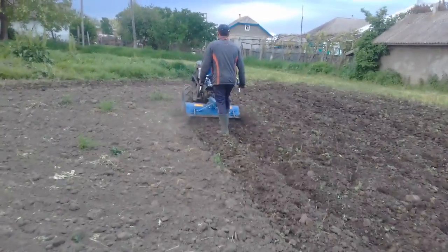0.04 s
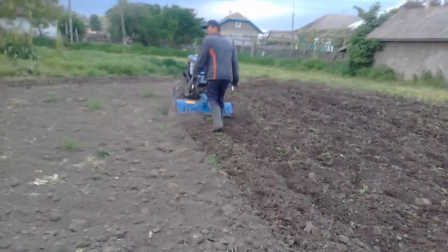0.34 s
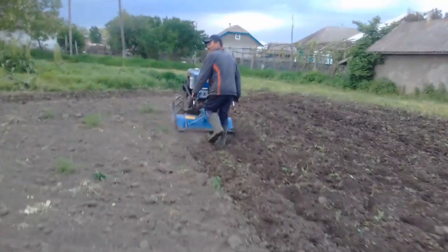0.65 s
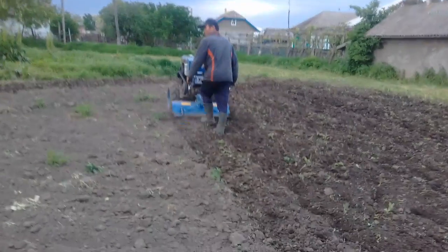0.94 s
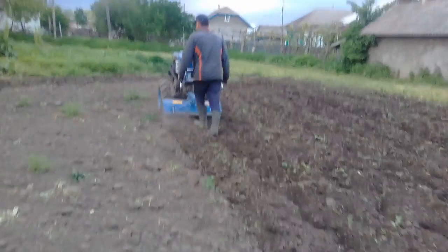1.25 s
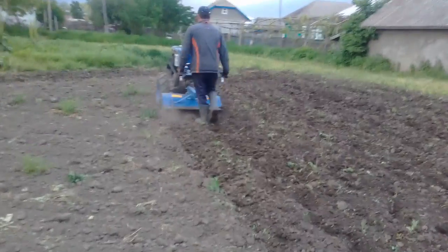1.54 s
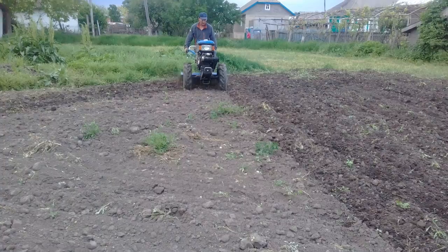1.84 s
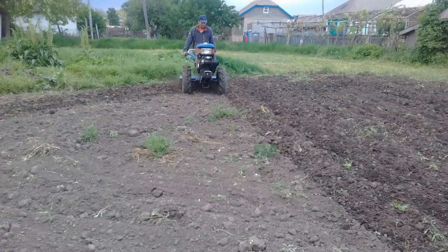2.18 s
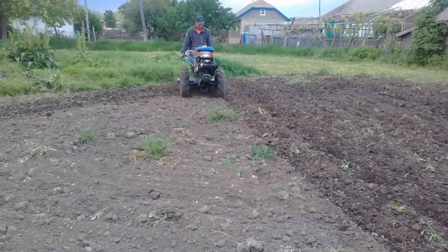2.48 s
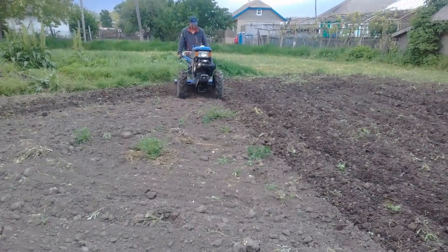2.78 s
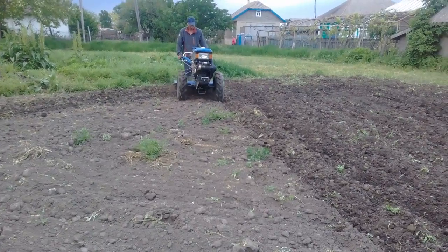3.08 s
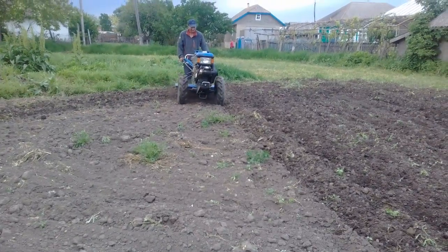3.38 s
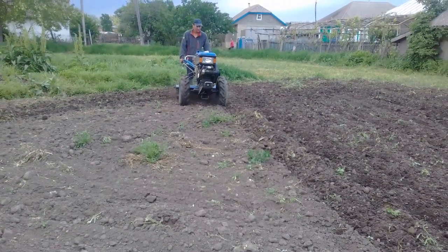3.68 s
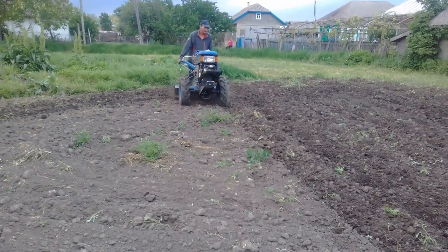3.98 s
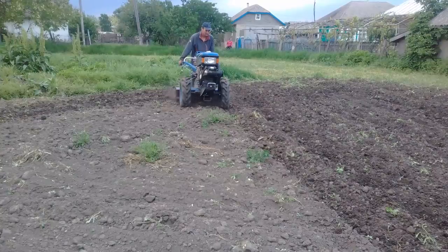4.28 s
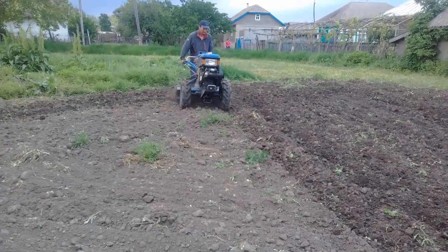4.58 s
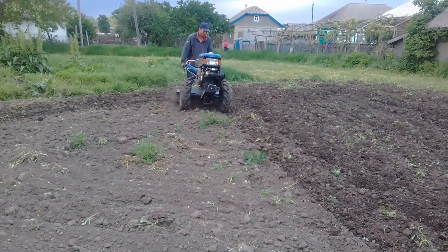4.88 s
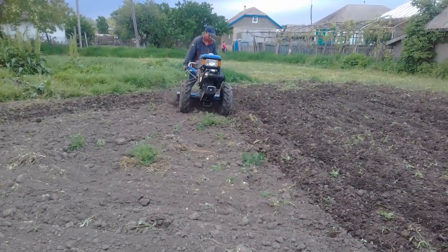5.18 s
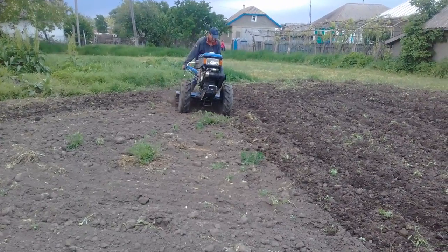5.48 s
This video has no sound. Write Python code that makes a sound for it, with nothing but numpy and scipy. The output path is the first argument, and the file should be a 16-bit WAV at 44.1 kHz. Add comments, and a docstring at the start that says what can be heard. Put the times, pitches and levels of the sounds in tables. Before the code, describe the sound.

Outdoors, wind rumbles and thumps on a small microphone over the rapid knocking of a one-cylinder diesel tiller heading away. Exhaust pulses, rattling metal and a thin gear whine run along with it. Everything stops abruptly for a moment, then the same engine fades back in without the wind, a little slower and brighter, chugging evenly under load as it creeps nearer.

```python
"""A single-cylinder diesel walk-behind tractor tills a garden. First it moves away, heard from behind,
at about 17 firings a second, while wind buffets the microphone. Each cycle, combustion knocks the block,
gas pulses thud in the pipes, and piston, valves and gears clatter and hiss; meshing teeth whine.
After a short silence it fades in from the front, at about 16 firings a second, coming nearer."""
import sys
import numpy as np
from scipy import signal
from scipy.fft import rfft, irfft, next_fast_len
from scipy.io import wavfile
from scipy.ndimage import map_coordinates

SR = 44100
rng = np.random.default_rng(int(sys.argv[2]) if len(sys.argv) > 2 else 0)


def wrap_up_sound(samples):
    """Save the sound to the file named by the first command line argument, as 16-bit audio."""
    columns = np.atleast_2d(samples).T
    # keep every value between -1 and 1, then stretch to whole-number steps
    tamed = np.clip(columns, -1, 1)
    steps = np.round(tamed * 32767).astype(np.int16)
    wavfile.write(sys.argv[1], SR, steps)


N = 243873
TIME_S = np.arange(N) / SR
AWAY_END_S, TOWARD_START_S = 1.738, 2.07
TOP_HZ = 15850

# Governed firing rate: (time [s], rate [Hz])
RATE_AWAY = [(0.0, 17.416), (0.44, 17.465), (0.87, 17.05), (1.3, 17.353), (1.74, 17.31)]
RATE_TOWARD = [(2.2, 16.082), (2.36, 15.952), (2.77, 16.215), (3.31, 16.043), (3.81, 16.216), (4.3, 15.696),
               (4.88, 16.051), (5.48, 15.807)]
# Hard and soft firings: (time [s], level over the usual knock [dB])
ODD_FIRINGS = [(.14, -10.5), (.32, -8), (.54, 5.5), (.72, 4), (1.07, 1.5), (1.24, 2), (2.36, 3),
               (2.55, 1.5), (2.61, -2), (3.05, 4), (3.11, -1.5), (3.23, -5), (3.54, 2.5), (3.67, 0.5),
               (3.91, 1.5), (4.73, -4.5), (5.11, 3.5), (5.24, 2.5), (5.42, 3)]
# Engine exposure past the driver: (time [s], gain [dB])
EXPOSURE_REAR = [(0, 3), (.2, 1.1), (.44, -2.1), (.78, 0), (1.13, 1.9), (1.53, -4), (1.72, -3.5)]
# Block modes: (frequency [Hz], relative level [dB], t60 [s])
BLOCK_REAR = [(626, -37, .06), (746, -23, 0.044), (1470, -20.5, 0.036), (2285, -12.5, 0.033),
              (2550, 2.5, 0.017), (2579, 5, 0.018), (3030, -7, 0.011), (3800, -12.5, 0.011)]
BLOCK_FRONT = [(689, -34.5, 0.17), (795, -13, 0.048), (820, -16, 0.062), (1512, -10, 0.026),
               (1790, -7.5, 0.012), (2121, 1.5, 0.018), (2495, -1.5, 0.018), (2785, -3.5, 0.032),
               (2928, 1, 0.014), (3860, -19, .012), (4620, -11, 0.014), (7800, -9, 0.012)]
# Intake and exhaust pulses: (phase [cycles], push + or suck - [relative])
PULSES_AWAY = [(.199, -0.36), (.48, 1), (0.761, 0.62)]
PULSES_TOWARD = [(0.279, -0.52), (.559, 0.87), (.842, 0.49)]
# Silencer and intake modes: (frequency [Hz], relative level [dB], t60 [s])
PIPES_REAR = [(137, -29.5, 0.09), (188.6, -32, 0.11), (262, -30.5, 0.093), (314, -30, 0.055),
              (378, -34.5, 0.052), (568, -37.5, 0.11)]
PIPES_FRONT = [(104, -45.5, 0.13), (133.3, -31.5, 0.078), (175.5, -24.5, 0.11), (245.8, -27, 0.059),
               (290, -30, 0.095), (320, -36.5, 0.049), (368, -38.5, 0.12), (547, -30.5, 0.091),
               (605, -35, .09)]
# Starts of the four piston strokes: (phase [cycles])
PHASES_AWAY, PHASES_TOWARD = [0, .23, .46, .77], [.015, .25, .505, .815]
# Burst per stroke, against the steady part: (clatter [dB], hiss [dB], power decay [cycles])
BURSTS_AWAY = [(4, 2, 0.2), (0, 10, 0.076), (-2, 3, 0.23), (2, 8.5, 0.06)]
BURSTS_TOWARD = [(4, 8.5, 0.18), (-8, -4, 0.083), (1.5, 5, 0.1), (-4.5, 10.5, 0.033)]
# Noise spectra: (frequency [Hz], relative density [dB])
CLATTER_REAR = [(90, -15), (200, -7.5), (340, -7.5), (480, -11), (620, -3.5), (780, -5), (1000, -1),
                (1170, -11), (1500, -2.5), (2070, -7), (2620, -6.5), (3430, -9), (5000, -11.5), (7000, -21)]
CLATTER_FRONT = [(150, -32), (300, -14), (460, -17.5), (600, -5.5), (820, -3.5), (1150, -9), (1450, -3),
                 (1750, -6), (2200, -7), (2900, -6.5), (3300, -9), (4700, -11.5), (6000, -14.5),
                 (8500, -29.5)]
HISS_SPECTRUM = [(3530, -31.5), (6000, -20.5), (6350, -13.5), (7710, -8.5), (8470, -8), (9330, -6),
                 (10000, -2), (10500, 0.5), (15100, -18), (15800, -19)]
# Tin cover and guard resonances: (frequency [Hz], width [Hz], boost [dB])
COVERS_REAR = [(605, 38, 10), (798.5, 20, 13), (1440, 66, 5.5), (2280, 41, 1.5), (3900, 220, 3),
               (5170, 170, 3.5)]
COVERS_FRONT = [(748, 8.3, 1.36), (791, 50, 7.8), (910, 13, 1), (1019, 52, 5.7), (1295, 22, 5.3),
                (2196, 54, 7.9), (3860, 133, 3.3), (4840, 67, 2.4)]
# Hiss from the front: (time [s], level [dB])
HISS_TOWARD = [(2.4, -27), (3.1, -25), (3.6, -25.5), (4.4, -23), (4.9, -24.8), (5.5, -25)]
# Gear tones: (meshings [1/cycle], level [dB])
GEARS_AWAY = [(44, -34)]
GEARS_TOWARD = [(38, -40), (44, -41.5), (49, -48.5)]
# Gusts: (time [s], half length [s], rumble [dB], flutter [dB])
GUSTS = [(.25, 0.033, -35, -30.5), (0.428, 0.039, -30, -20), (0.555, .04, -33, -19.5),
         (1.034, 0.037, -24, -24.5), (1.312, 0.022, -32, -40)]
# Hardest eddies: (time [s], level [dB], half length [s])
BUFFETS = [(0.381, -14.5, 0.0032), (0.441, -13, 0.0041), (0.526, -13, .007), (0.571, -15.5, .008),
           (.604, -9, 0.0085), (0.941, -25, 0.0088), (0.996, -20, 0.0048), (1.063, -24, .01)]


def tractor_away(knock_shading=0.71, clatter_shading=.7, whine_db_per_s=-3):
    """From behind: driver and tiller hood shade the engine, hiss most; the whine sinks with distance."""
    cycles = crank(RATE_AWAY, firing_s=.0274)
    exposure_db, = curves(EXPOSURE_REAR)
    block = knock(cycles, BLOCK_REAR, attack_s=.0006, spread_s=.0015, chatter_db=-1.5)
    block *= amp(-11 + knock_shading * exposure_db)
    gas = thuds(cycles, PULSES_AWAY, PIPES_REAR, attack_s=0.00046, scatter_db=1.5)
    running = machinery(cycles, zip(PHASES_AWAY, BURSTS_AWAY), CLATTER_REAR, COVERS_REAR,
                        clatter_db=-24.5 + clatter_shading * exposure_db,
                        hiss_db=-28.3 + exposure_db, hiss_tilt_db=-13.5)
    gears = amp(whine_db_per_s * TIME_S) * whine(cycles, GEARS_AWAY, backlash_rad=0.2)
    return block + gas + running + gears


def tractor_toward(free_rate_hz=16.2, sag_db_per_hz=-2.5, approach_db_per_s=0.29):
    """From the front: the bare engine grows slowly louder; dragged down by load, it knocks less."""
    cycles = crank(RATE_TOWARD, firing_s=2.1126)
    sag_hz = free_rate_hz - curves(RATE_TOWARD)[0]
    nearer_db = approach_db_per_s * (TIME_S - TOWARD_START_S)
    block = knock(cycles, BLOCK_FRONT, attack_s=0.00065, spread_s=0.0024, chatter_db=-4)
    block *= amp(-11.6 + nearer_db + sag_db_per_hz * sag_hz)
    gas = thuds(cycles, PULSES_TOWARD, PIPES_FRONT, attack_s=0.00088, scatter_db=0.94)
    running = machinery(cycles, zip(PHASES_TOWARD, BURSTS_TOWARD), CLATTER_FRONT, COVERS_FRONT,
                        clatter_db=-24 + nearer_db, hiss_db=curves(HISS_TOWARD)[0], hiss_tilt_db=0)
    return block + gas + running + whine(cycles, GEARS_TOWARD, backlash_rad=0.35)


def crank(rate, firing_s):
    """Cycle count, zero at firing_s; the cylinder fires at each integer."""
    cycles = np.cumsum(curves(rate)[0]) / SR
    return cycles - np.interp(firing_s, TIME_S, cycles)


def knock(cycles, block, attack_s, spread_s, chatter_db, chatter_decay_s=.012):
    """Sudden combustion rings the block; the piston chatters on briefly."""
    blows = amp(hardness_db(cycles)) * impulses(cycles, scatter_db=.8)
    tail = np.exp(-np.arange(SR // 16) / SR / chatter_decay_s)
    chatter = signal.oaconvolve(blows, tail / np.linalg.norm(tail))[:N] * rng.standard_normal(N)
    modes = sum((-1) ** k * amp(db) * ring(hz, t60_s, attack_s)
                for k, (hz, db, t60_s) in enumerate(block))
    click = signal.oaconvolve(blows + amp(chatter_db) * chatter, modes)[:N]
    # Higher modes build up later: the click becomes a clack.
    lag_s = lambda f: np.interp(f, [1700, 3100], [0, spread_s])
    return filtered(click, lambda f: np.exp(-2j * np.pi * np.cumsum(lag_s(f)) * f[1]))


def hardness_db(cycles):
    """Knock gain: an odd firing affects its own cycle only."""
    firing = np.round(cycles)
    return sum(db * (firing == np.round(np.interp(s, TIME_S, cycles))) for s, db in ODD_FIRINGS)


def thuds(cycles, pulses, pipes, attack_s, scatter_db):
    """Near-equal gas pulses ring the pipes, giving harmonics of the firing rate."""
    drive = sum(push * impulses(cycles - phase, scatter_db) for phase, push in pulses)
    modes = sum(amp(db) * ring(hz, t60_s, attack_s) for hz, db, t60_s in pipes)
    return signal.oaconvolve(drive, modes)[:N]


def machinery(cycles, strokes, spectrum, covers, clatter_db, hiss_db, hiss_tilt_db):
    """Piston, valves and gears: clatter coloured by tin covers, metallic hiss above."""
    clatter_gate, hiss_gate = bursts(cycles, strokes)
    tin = lambda f: amp(sum(db / (1 + (2 * (f - hz) / width_hz) ** 2) for hz, width_hz, db in covers))
    tilt = lambda f: amp(hiss_tilt_db * f / TOP_HZ)
    clatter = filtered(clatter_gate * rattle(grain_db=1), lambda f: colour(spectrum, f) * tin(f))
    hiss = filtered(hiss_gate * rattle(grain_db=0.9), lambda f: colour(HISS_SPECTRUM, f) * tilt(f))
    return unit_rms(clatter) * amp(clatter_db) + unit_rms(hiss) * amp(hiss_db)


def bursts(cycles, strokes, rise_cycles=0.029, scatter_db=2.3):
    """Clatter and hiss envelopes: each stroke swells fast, then decays."""
    power = np.ones((2, N))
    for phase, (clatter_db, hiss_db, decay_cycles) in strokes:
        age = (cycles - phase) % 1
        shape = (1 - np.exp(-age / rise_cycles)) * np.exp(-age / decay_cycles)
        shape *= amp(scatter_db * wobble(16))
        power += 2 * amp([[clatter_db], [hiss_db]]) ** 2 * shape
    return [unit_rms(np.sqrt(p)) for p in power]


def rattle(grain_db):
    """Dense small impacts: noise in clumps of about 1 ms."""
    return rng.standard_normal(N) * amp(grain_db * wobble(900))


def whine(cycles, gears, backlash_rad, waver_db=2.0):
    """Teeth mesh in step with the crank; play unsettles level and phase."""
    tones = np.zeros(N)
    for teeth, db in gears:
        waver = amp(waver_db * wobble(8.2))
        phase_rad = 2 * np.pi * round(teeth) * cycles + backlash_rad * wobble(11)
        tones += amp(db) * unit_rms(waver * np.sin(phase_rad))
    return tones


def wind(breeze_db=-42, rumble_hz=75, flutter_depth_db=3.0):
    """Gusts rumble and flutter on the microphone; the hardest eddies hit as short blasts."""
    rumble = unit_rms(filtered(rng.standard_normal(N),
                               lambda f: f / (f + 15) / (1 + (f / rumble_hz) ** 2)))
    flutter = unit_rms(eddies(edge_hz=530) * amp(flutter_depth_db * wobble(70)))
    air = amp(breeze_db) * rumble
    for time_s, half_s, rumble_db, flutter_db in GUSTS:
        air += swell(time_s, half_s) * (amp(rumble_db) * rumble + amp(flutter_db) * flutter)
    for time_s, db, half_s in BUFFETS:
        shape = swell(time_s, half_s)
        blast = eddies(edge_hz=400 + 3000 * amp(db) ** 2) * shape  # harder is brighter
        air += amp(db) * unit_rms(blast) * np.sqrt(np.mean(shape ** 2))
    return air


def eddies(edge_hz, low_hz=290):
    """Band-limited turbulence at the microphone port."""
    band = lambda f: f / np.hypot(f, low_hz) / np.sqrt(1 + (f / edge_hz) ** 5)
    return unit_rms(filtered(rng.standard_normal(N), band))


def impulses(cycles, scatter_db):
    """One impulse per cycle, random in size."""
    hits = np.diff(np.floor(cycles), prepend=np.floor(cycles[0]))
    return hits * amp(scatter_db * rng.standard_normal(N))


def ring(hz, t60_s, attack_s):
    """Damped mode, soft onset."""
    t = np.arange(SR // 8) / SR
    return np.sin(2 * np.pi * hz * t) * np.exp(-np.log(1000) * t / t60_s) * (1 - np.exp(-t / attack_s))


def swell(time_s, half_s):
    """Gaussian envelope."""
    return np.exp(-.5 * ((TIME_S - time_s) / half_s) ** 2)


def wobble(rate_hz):
    """Smooth random curve with knots at rate_hz."""
    return map_coordinates(rng.standard_normal(N // 8), [TIME_S * rate_hz], mode="wrap")


def curves(rows):
    """Each column after the time, interpolated per sample."""
    times_s, *columns = np.transpose(rows)
    return [np.interp(TIME_S, times_s, column) for column in columns]


def colour(points, hz):
    """Spectrum gain on a log frequency axis, steep beyond the ends."""
    knots_hz, db = np.transpose(points)
    skirts = np.minimum(1, hz / knots_hz[0]) ** 2 * np.minimum(1, knots_hz[-1] / (hz + 1)) ** 2
    return amp(np.interp(np.log(hz + 1), np.log(knots_hz), db)) * skirts


def filtered(x, response):
    """FFT filter; response takes Hz."""
    size = next_fast_len(N + SR // 2)
    return irfft(rfft(x, size) * response(np.fft.rfftfreq(size, 1 / SR)), size)[:N]


def amp(db):
    """Decibels to gain."""
    return 10 ** (np.asarray(db) / 20)


def unit_rms(x):
    """Scaled to rms 1."""
    return x / np.sqrt(np.mean(x ** 2) + 1e-20)


def scene():
    """Rear view in wind, silence, front view fading in."""
    fade_out = np.clip((AWAY_END_S - TIME_S) / 0.012, 0, 1)
    fade_in = (TIME_S > TOWARD_START_S) * np.clip((TIME_S - 2.04) / 0.39, 0, 1)
    return (fade_out * (tractor_away() + wind()) + fade_in * tractor_toward())[None]


def record(dry, low_cut_hz=85, ceiling=.92):
    """Small microphone: bass cut, soft clipping of the hardest blasts, band limit."""
    thin = signal.sosfilt(signal.butter(3, low_cut_hz, "high", fs=SR, output="sos"), dry[0])
    rounded = thin / (1 + (thin / ceiling) ** 6) ** (1 / 6)
    return filtered(rounded, lambda hz: hz < TOP_HZ)[None]


dry = scene()
out = record(dry)
wrap_up_sound(out)
```